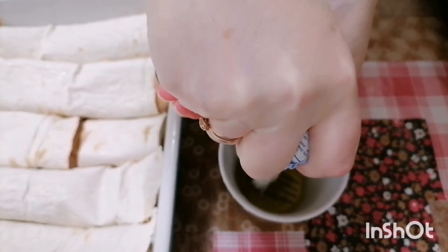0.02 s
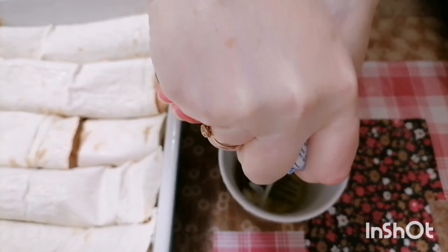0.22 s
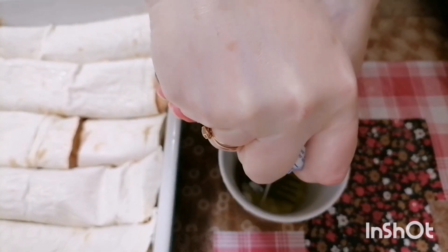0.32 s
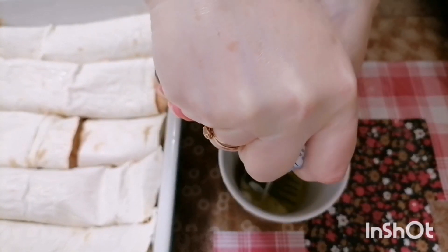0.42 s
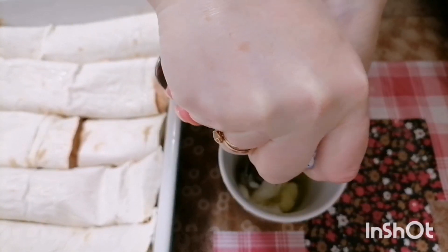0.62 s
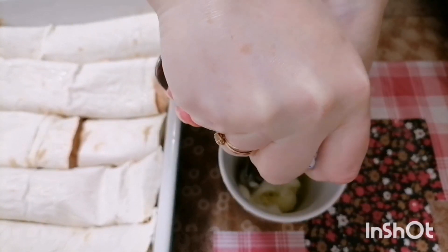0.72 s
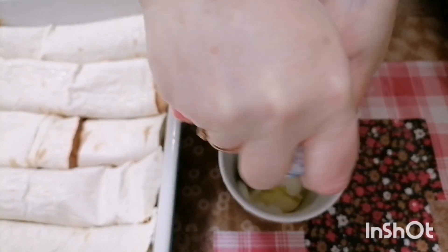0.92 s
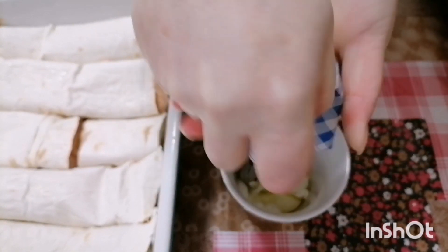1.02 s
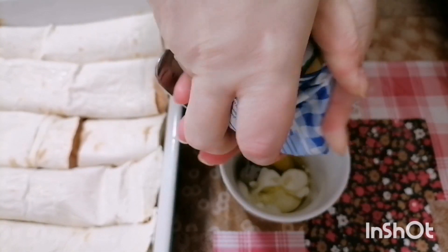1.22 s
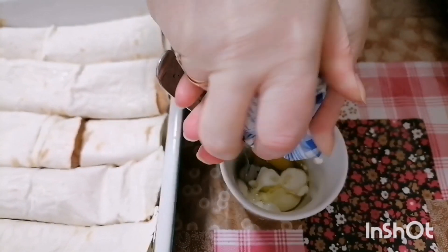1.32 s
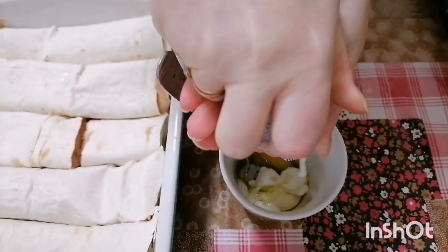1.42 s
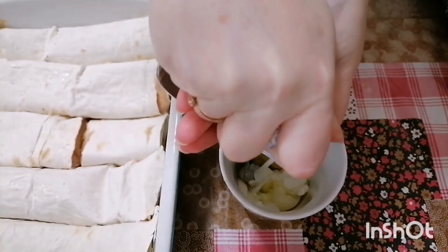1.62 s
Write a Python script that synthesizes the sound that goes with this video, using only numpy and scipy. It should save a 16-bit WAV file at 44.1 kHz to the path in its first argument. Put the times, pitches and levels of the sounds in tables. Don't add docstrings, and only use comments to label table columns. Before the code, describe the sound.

Close up in a small quiet kitchen, hands squeeze a cream pouch over a cup; bright film snaps and wet bubbling pops build to a peak, then the grip loosens with soft rustling and dry ticks.

```python
import sys
import numpy as np
from scipy import signal
from scipy.fft import rfft, irfft
from scipy.io import wavfile
from scipy.ndimage import uniform_filter1d

SR = 44100
rng = np.random.default_rng(int(sys.argv[2]) if len(sys.argv) > 2 else 0)


def transcribe(signal):
    frames = np.atleast_2d(signal).T
    limited = np.clip(frames, -1, 1)
    pcm = np.round(limited * 32767).astype(np.int16)
    wavfile.write(sys.argv[1], SR, pcm)


def field_ratio(decibels):
    return 10 ** (np.asarray(decibels, dtype=float) / 20)


N = 74970
t = np.arange(N) / SR
RELEASE_S = 0.93

# (centre [Hz], width [Hz], level [dB])
FILM_MODES = [(2800, 320, -9.5), (5340, 840, -4), (7200, 310, -6.5), (8340, 140, -10), (8870, 1020, -1),
              (8870, 1600, -1), (11100, 6200, -18), (12500, 1200, -13), (14440, 920, -18.5)]
# (centre [Hz], width [Hz], level [dB])
CREAM_MODES = [(145, 22, -1), (262, 26, 0), (357, 18, 2), (470, 30, -7), (577, 36, -3)]


def unit(x):
    return x / np.sqrt(np.mean(x ** 2))


def ring(x, hz, width_hz):
    return signal.lfilter(*signal.iirpeak(min(hz, 0.45 * SR), hz / width_hz, fs=SR), x)


def body(x, modes):
    return sum((-1) ** k * field_ratio(db) * ring(x, hz, w) for k, (hz, w, db) in enumerate(modes))


def highpass(x, hz, order):
    return signal.lfilter(*signal.butter(order, hz, "high", fs=SR), x)


def wander(length, samples):
    return unit(uniform_filter1d(rng.standard_normal(length), size=samples))


def add(out, at_s, peak_db, x):
    i = max(int(at_s * SR), 0)
    out[i:i + len(x)] += (field_ratio(peak_db) * x / np.abs(x).max())[:N - i]


def grains(per_s, scatter_db):
    chance, sign, size = rng.random((3, N))
    size_db = np.minimum(-scatter_db * np.log(size + 1e-9), 24)
    return (chance < per_s / SR) * np.sign(sign - 0.5) * field_ratio(size_db)


def effort(column):
    # (time [s], film creasing [dB], cream flow [dB], cup ring [Hz])
    squeeze = [(0, -66.5, -74.5, 1148), (.18, -58.5, -90, 1160), (.26, -48.5, -68.5, 1150),
               (.34, -49.5, -58, 1206), (.42, -47.5, -47, 957), (.52, -42, -53.5, 1000),
               (.6, -44.5, -46, 1140), (.7, -44, -47, 1080), (.77, -36.5, -37.5, 1123),
               (.87, -37.5, -45.5, 1086), (.93, -47, -51, 1134), (.97, -53.5, -64, 1095),
               (1.18, -56, -81.5, 1035), (1.23, -79, -81, 1025), (1.38, -69, -76, 1004),
               (1.7, -75, -78, 1020)]
    rows = np.array(squeeze)
    return np.interp(t, rows[:, 0], rows[:, column])


def damped_rings(table, rough_db):
    out, u = np.zeros(N), t[:4096]
    push_s = 0.00018
    for s, db, hz, t60_ms in table:
        t60_s = t60_ms / 1e3
        push = u / push_s * np.exp(-u / push_s)
        wake = np.exp(-u / (t60_s / 3)) * rng.standard_normal(len(u))
        width_hz = np.log(1000) / np.pi / t60_s
        sound = ring(push + field_ratio(rough_db) * wake, hz, width_hz)
        add(out, s, db, ring(sound, hz, 0.76 * hz))
    return out


def kitchen():
    # (frequency [Hz], density [dB per Hz])
    hush = [(12, 6.5), (20, -15), (198, -10), (255, -15.5), (759, -22), (1480, -34.5), (4060, -52),
            (6180, -53.5), (16000, -43.5)]
    level_db, like_below_hz = -65.5, 200
    f = np.fft.rfftfreq(N, 1 / SR) + 1
    hz, db = np.array(hush).T
    gain = field_ratio(np.interp(np.log(f), np.log(hz), db))
    mid, side = rfft(rng.standard_normal((2, N))) * gain
    side = side * np.clip(f / like_below_hz / 4 + 50 / f, 0, 1)
    return field_ratio(level_db) * irfft(np.array([mid + side, mid - side]), N) / np.std(irfft(mid, N))


def crackle():
    level_db, per_s, scatter_db, flurry_db, lull_db = -7.5, 2000, 0.5, 3.65, 3
    out, lull = 0, lull_db * wander(N, 400)
    for mode in FILM_MODES:
        flurry = flurry_db * wander(N, 500)
        out = out + field_ratio(flurry + lull) * body(grains(per_s, scatter_db), [mode])
    return field_ratio(effort(column=1) + level_db) * unit(out)


def bubbles():
    # (centre [Hz], width [Hz], level [dB])
    cup_modes = [(701, 52, -10), (797, 36, -8.5), (1300, 240, -17.5), (1800, 200, -27.5)]
    level_db, per_s, scatter_db, air_t60_s = -5.5, 1200, 1.5, 0.045
    wall_from_s, wall_db = 0.42, 27.5
    drops = grains(per_s, scatter_db)
    turn = np.exp(2j * np.pi * np.cumsum(effort(column=3)) / SR)
    decay = np.exp(-np.log(1000) / air_t60_s / SR)
    air = (turn * signal.lfilter([1], [1, -decay], drops / turn)).imag
    opening = np.clip((t - wall_from_s) / 0.07 + 1, 0.1, 1)
    wall = field_ratio(wall_db) * body(unit(drops) * opening, cup_modes)
    return field_ratio(effort(column=2) + level_db) * (unit(air) + wall)


def squelch():
    level_db, follow, rest_db, cut_hz = -6.5, 0.88, -56.5, 131
    smooth_db = uniform_filter1d(effort(column=2), size=1500)
    slips = highpass(unit(body(grains(250, 1.27), CREAM_MODES)), cut_hz, 2)
    return slips * field_ratio(rest_db + level_db + follow * (smooth_db - rest_db))


def snaps():
    # (time [s], peak [dB], ring [Hz])
    early_snaps = [(0.0054, -40, 5080), (0.0094, -37, 9290), (0.0766, -50, 9300), (0.1125, -46.5, 8600),
                   (0.133, -51.5, 10700), (0.1481, -39.5, 9100), (0.1679, -41, 9700), (0.1986, -41, 8870),
                   (0.2163, -24, 9000), (0.2157, -27.5, 6160), (0.248, -25, 6240), (0.3001, -41, 6050),
                   (0.3002, -41, 9200), (0.325, -46, 8900), (0.3136, -27, 6660), (0.339, -26, 6730),
                   (0.3463, -28.5, 8850), (0.3754, -34, 8700), (0.381, -36, 6400), (0.3903, -39, 9900),
                   (0.409, -32, 6900), (0.4276, -27.5, 8340), (0.4589, -33.5, 7950), (0.4654, -31.5, 8340),
                   (0.4792, -27.5, 6830), (0.49, -22, 8370), (0.5105, -21, 8300), (0.5286, -26.5, 8870),
                   (0.5554, -39.5, 7450), (0.602, -32.5, 8800), (0.615, -35.5, 8700), (0.648, -33, 8800)]
    # (time [s], peak [dB], ring [Hz])
    late_snaps = [(0.626, -32, 8600), (0.6358, -21.5, 8870), (0.6692, -31, 8200), (0.7017, -46, 9000),
                  (0.734, -29, 8380), (0.749, -30, 8400), (0.7792, -33, 8200), (0.784, -21, 8480),
                  (0.798, -28.5, 8700), (0.815, -26.5, 8050), (0.829, -23, 8400), (0.851, -21, 6020),
                  (0.844, -60, 8460), (0.873, -42, 11600), (0.8616, -23, 8470), (0.8897, -29.5, 7860),
                  (0.9011, -31, 9100), (0.915, -35, 8900), (0.9245, -35, 7550), (0.9538, -51, 8900),
                  (0.9874, -41, 9340), (1.014, -48, 8500), (1.031, -50, 9900), (1.1673, -47.5, 9600),
                  (1.049, -45.5, 8800), (1.1013, -33, 8470), (1.254, -54.5, 8140), (1.318, -59, 8300),
                  (1.3783, -33.5, 8880), (1.379, -35.5, 5500), (1.441, -55, 9400), (1.513, -62, 9100),
                  (1.476, -49, 7650), (1.565, -52.5, 9800), (1.5858, -60, 9500)]
    rise_s, burst_s, tail_s, tail_db = 0.00099, 0.0015, 0.0029, -7
    width_hz, film_db, patch_db = 950, -9, 7
    out, u = np.zeros(N), t[:2048]
    decay = np.exp(-(u / burst_s) ** 2) + field_ratio(tail_db) * np.exp(-u / tail_s)
    shape = (1 - np.exp(-u / rise_s)) * decay
    for s, db, hz in early_snaps + late_snaps:
        burst = shape * rng.standard_normal(len(u))
        offsets = patch_db * rng.standard_normal(len(FILM_MODES))
        patch = [(f, w, g + d) for (f, w, g), d in zip(FILM_MODES, offsets)]
        crease = ring(ring(burst, hz, width_hz), hz, 2 * width_hz)
        add(out, s, db, unit(crease) + field_ratio(film_db) * unit(body(burst, patch)))
    return out


def ticks():
    # (time [s], peak [dB], ring [Hz])
    tick_table = [(0.0054, -42.5, 3250), (0.0094, -40.5, 2290), (0.386, -38, 3040), (0.4794, -32.5, 2730),
                  (0.5536, -42, 2660), (0.6598, -37.5, 2700), (0.7959, -36, 2950), (1.3198, -42.5, 2060),
                  (1.3452, -36, 1770), (1.3564, -37, 2200), (1.3791, -33.5, 1950), (1.4087, -48, 2130),
                  (0.366, -48, 2770), (0.5345, -55, 2660), (0.5949, -41.5, 2800), (0.7285, -44, 2850),
                  (0.7494, -40.5, 2980), (0.764, -41, 2900), (0.7785, -36, 2920), (0.8359, -46.5, 2680),
                  (1.076, -50.5, 2760), (1.121, -46, 2800), (1.128, -47, 3050), (1.1658, -49, 3100),
                  (1.521, -57, 1660), (1.553, -53, 2270), (1.5646, -49.5, 1680), (1.5832, -48.5, 1850),
                  (1.598, -55.5, 2660), (1.4318, -43, 1880), (1.457, -41.5, 3480), (1.4777, -43, 1800)]
    t60_ms, body_hz, body_db = 4, 990, -14.5
    clicks = [(s, db, hz, t60_ms) for s, db, hz in tick_table]
    dull = [(s, db + body_db, body_hz, t60_ms) for s, db, hz in tick_table]
    return damped_rings(clicks, rough_db=-7) + damped_rings(dull, rough_db=-14)


def pops():
    # (time [s], peak [dB], ring [Hz], t60 [ms])
    pop_table = [(0.113, -64.5, 999, 34), (0.213, -42.5, 1300, 22), (0.27, -50, 1120, 7.6),
                 (0.299, -43.5, 1090, 24), (0.326, -46, 1070, 45), (0.348, -37, 1163, 25),
                 (0.339, -37, 1120, 23), (0.376, -40, 1080, 36), (0.427, -35, 978, 37),
                 (0.4797, -22, 945, 25), (0.4797, -29, 1130, 10), (0.554, -31.5, 1052, 13),
                 (0.593, -43, 1070, 25), (0.67, -36, 1078, 24), (0.282, -52, 1200, 8.2),
                 (0.78, -32.5, 1070, 27), (0.914, -40, 1158, 15), (1.618, -47, 1200, 6.4)]
    return damped_rings(pop_table, rough_db=-14)


def thuds():
    # (time [s], peak [dB])
    knocks = [
        (.168, -51.5),
        (0.216, -45),
        (0.481, -47.5),
        (.78, -56),
        (1.344, -65.5),
        (1.61, -63.5),
    ]
    table_hz, table_width_hz = 60.7, 8.1
    out, u = np.zeros(N), t[:8192]
    push = u * np.exp(-u / 0.00031)
    for s, db in knocks:
        if s > RELEASE_S:
            knock = ring(push, table_hz, table_width_hz)
        else:
            knock = body(push, CREAM_MODES)
        add(out, s, db, knock)
    return out


def cracks():
    # (time [s], peak [dB], low edge [Hz])
    crack_table = [(0.2133, -36, 4800), (.2485, -45, 5030), (.3398, -28, 4100), (.347, -25, 3070),
                   (0.41, -27.5, 5630), (0.4457, -31, 9000), (0.6012, -35, 4500), (.704, -36.5, 9000),
                   (0.7514, -25, 3000), (.8515, -34, 4680), (1.0997, -33, 4270), (.4797, -32, 1500),
                   (0.5294, -28.5, 9000), (0.9013, -32, 8000), (.9155, -35, 7000), (1.3186, -43.5, 2500),
                   (1.379, -43, 2500), (1.457, -57, 4000), (1.479, -48.5, 2500), (1.566, -48.5, 8000)]
    click_s, echo_s = 0.00023, 0.0013
    out, u = np.zeros(N), t[:512]
    late = np.maximum(u - echo_s, 0)
    shape = np.exp(-u / click_s) + (late > 0) * np.exp(-late / (2 * click_s))
    for s, db, low_hz in crack_table:
        band = signal.butter(2, [low_hz, 15000], "band", fs=SR)
        burst = signal.lfilter(*band, shape * rng.standard_normal(len(u)))
        add(out, s, db, burst + ring(burst, 5900, 2500))
    return out


def swells():
    # (crest time [s], peak [dB], ring [Hz], half length [ms])
    swell_table = [(0.395, -34, 996.4, 10.3), (.412, -43, 990, 7), (0.431, -35, 1005, 4.9),
                   (0.629, -41.5, 1060, 6.4), (0.654, -35, 1073, 4.3), (0.686, -42.5, 1054, 35),
                   (.72, -44, 1060, 9.8), (0.749, -32, 1075, 6.4), (.769, -26, 1046, 4.8),
                   (.806, -44.5, 1090, 3.9), (.839, -32, 1074, 4.5), (.856, -37, 1064, 4.6),
                   (.868, -33.5, 1110, 2)]
    wobble = 0.01
    half_s = 2048 / SR
    out, u = np.zeros(N), t[:4096] - half_s
    for s, db, hz, half_ms in swell_table:
        pitch_hz = hz * (1 + wobble * wander(len(u), 200))
        tone = np.sin(2 * np.pi * np.cumsum(pitch_hz) / SR)
        length_s = half_ms / 1e3 * np.where(u > 0, 0.8, 1.2)
        add(out, s - half_s, db, tone * np.exp(-(u / length_s) ** 2))
    return out


def peel():
    # (centre [Hz], width [Hz], level [dB])
    peel_modes = [(2300, 1400, 1), (3100, 3900, 6), (5600, 3800, -12.5), (9100, 2100, 0.5)]
    level_db, flurry_db = -56, 4.5
    shape = np.interp(t, [RELEASE_S, RELEASE_S + 0.059, 1.15, 1.215], [0.13, 0.4, 0.79, 0.16])
    for at_s, length_s, db in [(0.9, 0.016, 1.5), (1.58, 0.021, -12.5)]:
        shape = shape + field_ratio(db) * np.exp(-((t - at_s) / length_s) ** 2)
    rustle = 0
    for mode in peel_modes:
        flurry = field_ratio(flurry_db * wander(N, 300))
        rustle = rustle + flurry * body(grains(1700, 2.05), [mode])
    return field_ratio(level_db) * shape * unit(rustle)


def ports(x, pan_db, lag_s):
    f = np.minimum(np.fft.rfftfreq(N, 1 / SR), 9500)
    turn = np.exp(2j * np.pi * f * lag_s)
    return np.array([x * field_ratio(pan_db / 2), irfft(rfft(x) * turn, N) * field_ratio(-pan_db / 2)])


def film_width(film):
    level_db, above_hz = -3, 3240
    side = field_ratio(level_db) * wander(N, 30) * highpass(film, above_hz, 1)
    return side * np.array([[1], [-1]])


def room(x):
    t60_s, level_db, top_hz, gap_s = 0.17, -13, 7560, 0.002
    u = t[:SR // 2]
    tail = signal.lfilter(*signal.butter(1, top_hz, fs=SR), rng.standard_normal((2, len(u))))
    tail = tail * field_ratio(-60 * u / t60_s) * (u > gap_s)
    tail = tail / np.sqrt((tail ** 2).sum(axis=1, keepdims=True))
    return field_ratio(level_db) * signal.fftconvolve(x[None], tail, axes=1)[:, :N]


def scene():
    # (time [s], left minus right [dB])
    hands = [
        (0.0, 9.0),
        (0.364, -2.5),
        (0.524, -1),
        (0.984, 1),
        (1.092, -4.5),
        (1.25, 3),
        (1.5, -2),
        (1.542, 1),
        (1.7, 0),
    ]
    lag_s = -2.4e-5
    film = crackle() + snaps() + ticks() + cracks() + peel()
    cup = bubbles() + pops() + swells()
    cream = squelch() + thuds()
    film_pan_db = np.interp(t, *np.array(hands).T)
    direct = ports(film, film_pan_db, lag_s) + ports(cup, 3, lag_s) + ports(cream, -2.9, 6 * lag_s)
    return direct + film_width(film) + room(film + cup + cream) + kitchen()


def roll_off(x):
    return signal.sosfilt(signal.butter(12, 16400, fs=SR, output="sos"), x)


def record(dry):
    bass_db, air_db, dip_share, top_hz = 5.5, 3.5, 0.62, 15900
    bass = (field_ratio(bass_db) - 1) * ring(dry, 45, 60)
    air = (field_ratio(air_db) - 1) * ring(dry, 14500, 4000)
    dip = dip_share * ring(dry, 3850, 650)
    top = signal.ellip(6, 0.5, 35, top_hz, fs=SR, output="sos")
    return roll_off(signal.sosfilt(top, dry + bass + air - dip))


dry = scene()
out = record(dry)
transcribe(out)
```